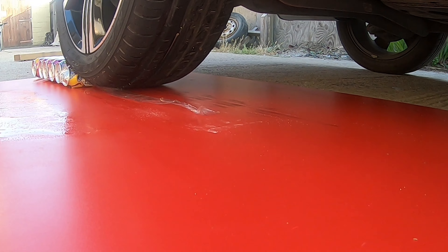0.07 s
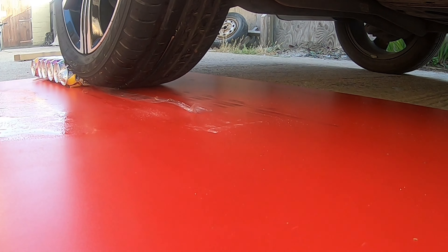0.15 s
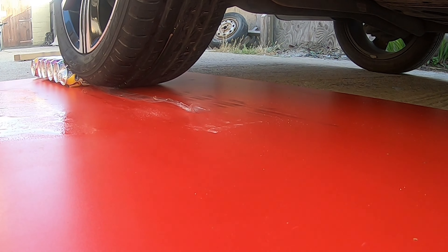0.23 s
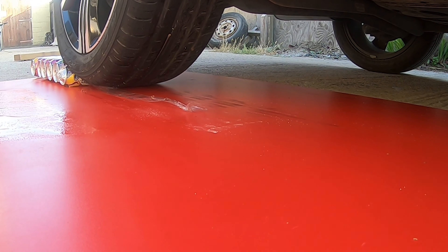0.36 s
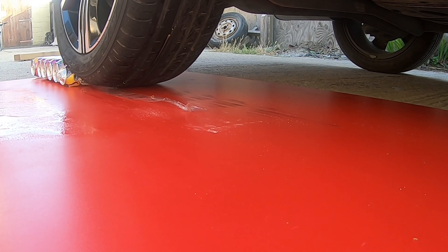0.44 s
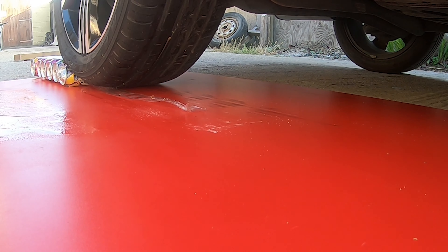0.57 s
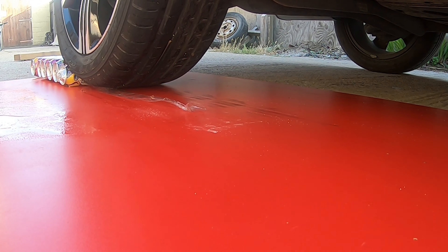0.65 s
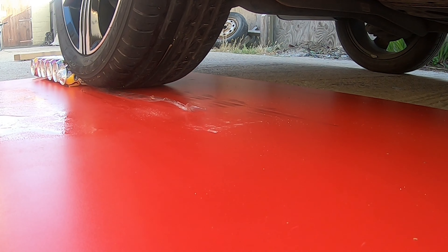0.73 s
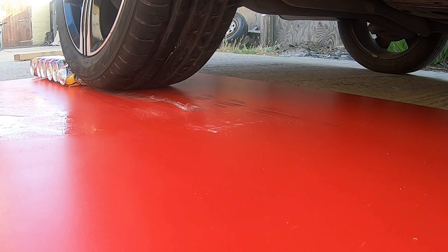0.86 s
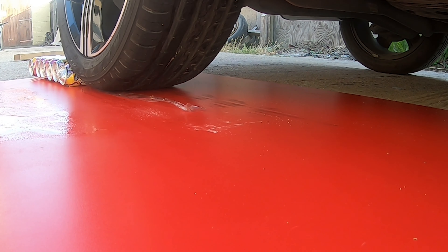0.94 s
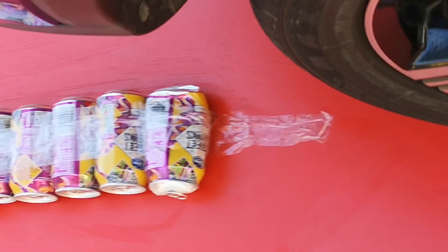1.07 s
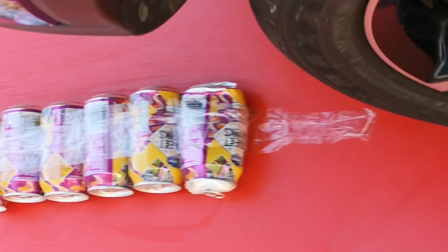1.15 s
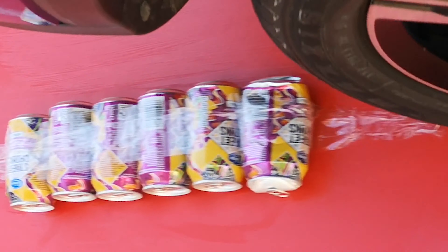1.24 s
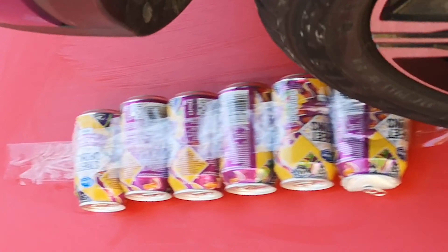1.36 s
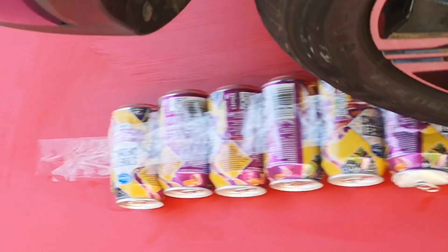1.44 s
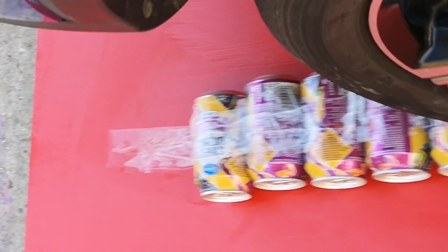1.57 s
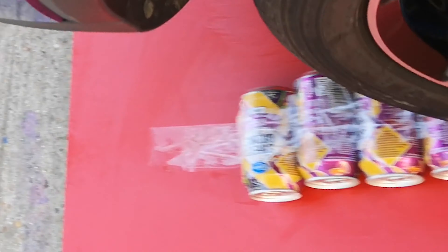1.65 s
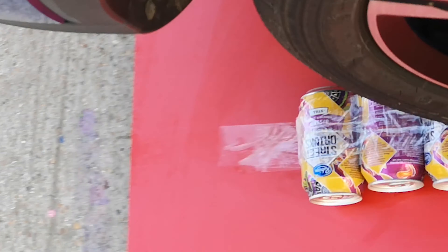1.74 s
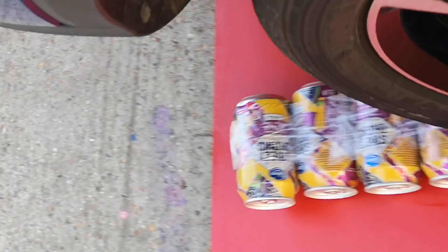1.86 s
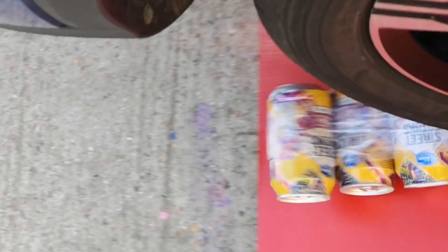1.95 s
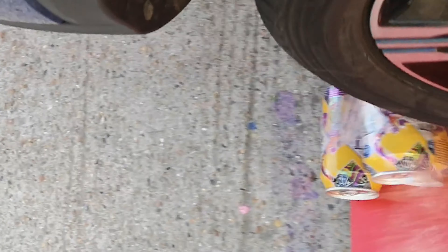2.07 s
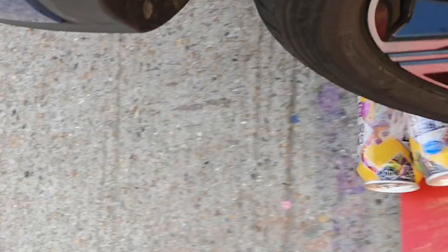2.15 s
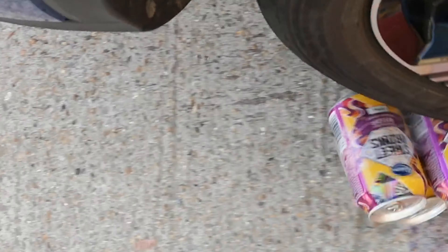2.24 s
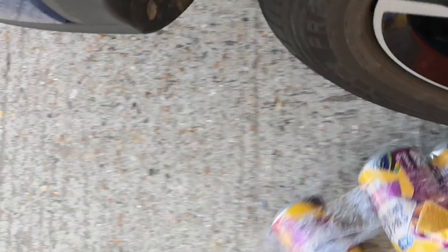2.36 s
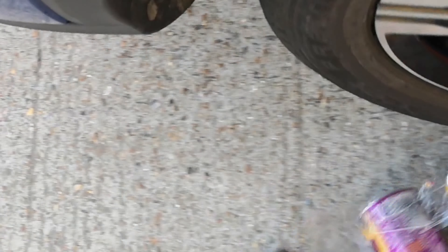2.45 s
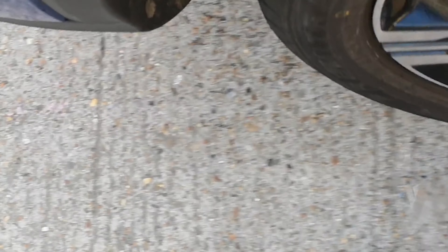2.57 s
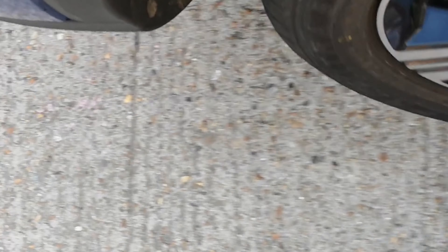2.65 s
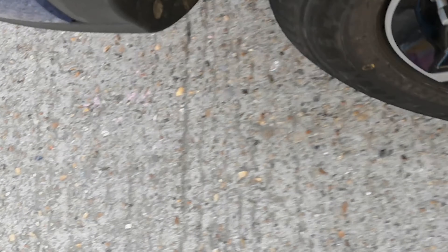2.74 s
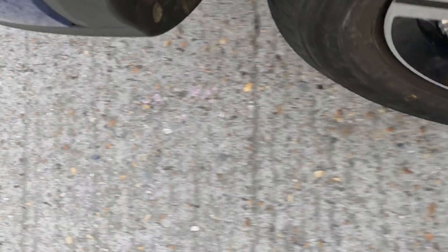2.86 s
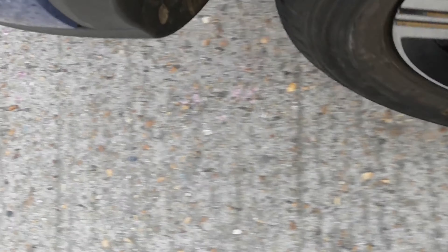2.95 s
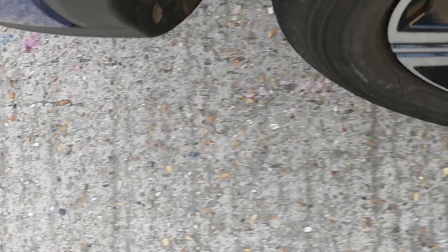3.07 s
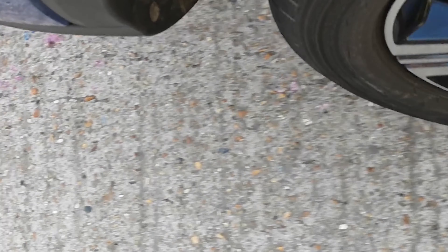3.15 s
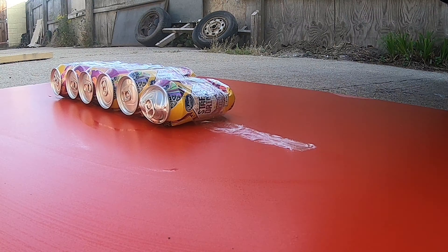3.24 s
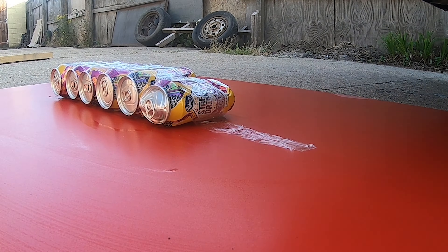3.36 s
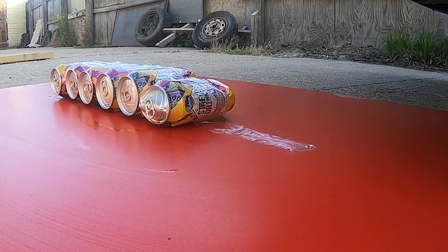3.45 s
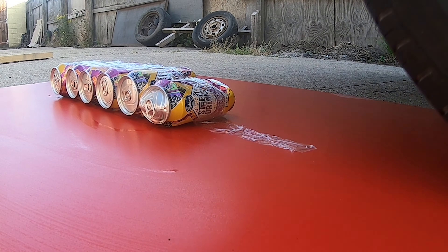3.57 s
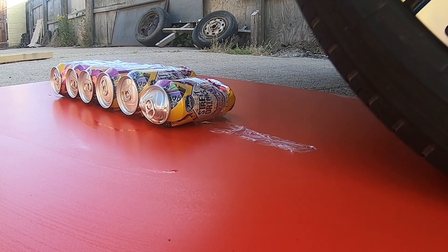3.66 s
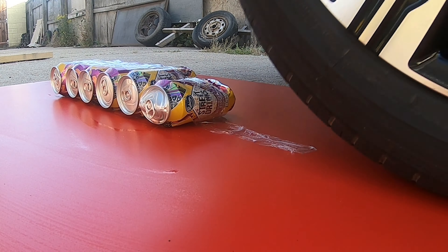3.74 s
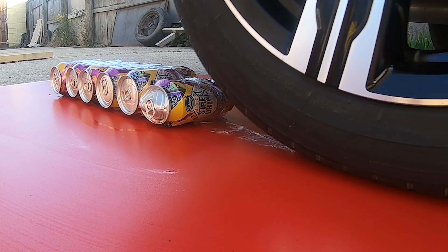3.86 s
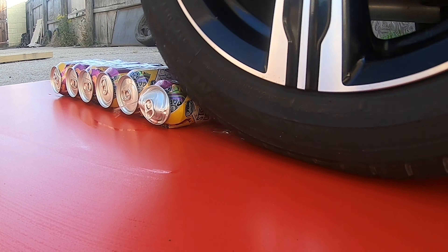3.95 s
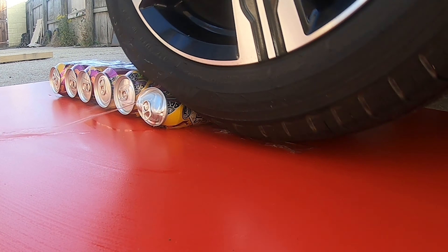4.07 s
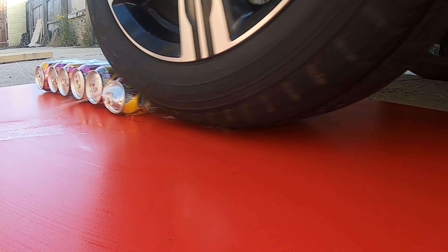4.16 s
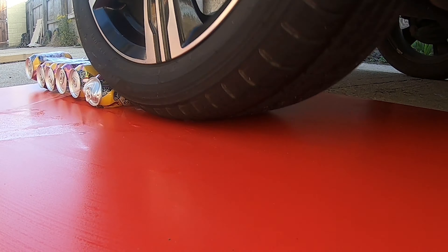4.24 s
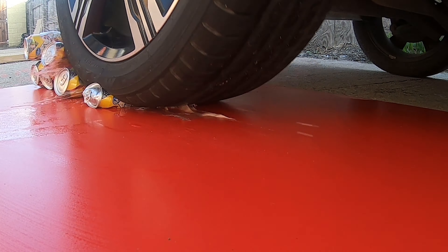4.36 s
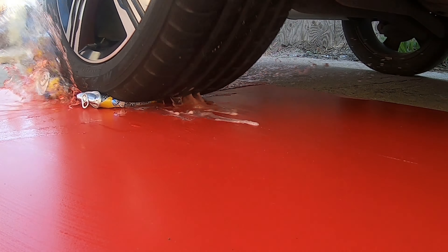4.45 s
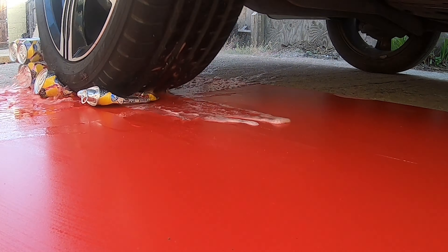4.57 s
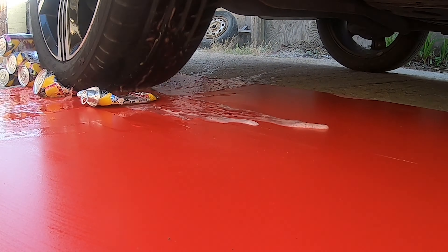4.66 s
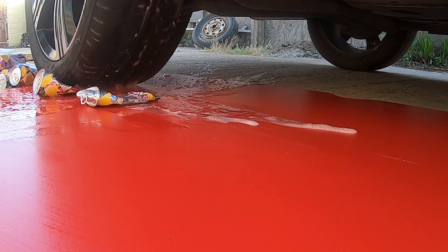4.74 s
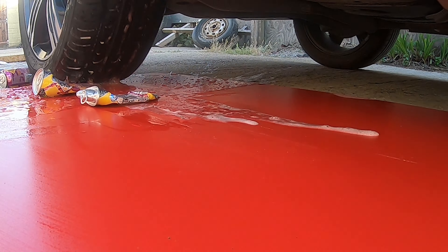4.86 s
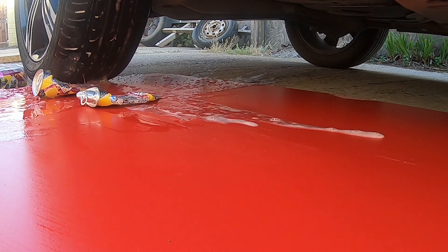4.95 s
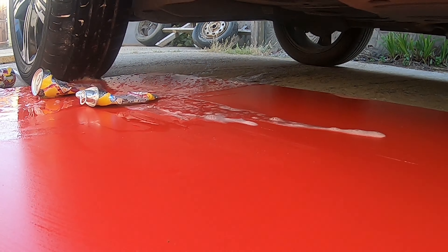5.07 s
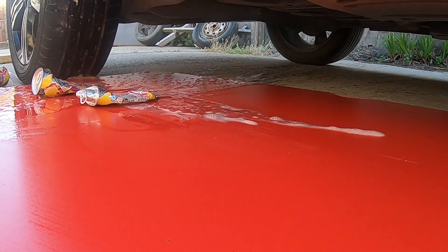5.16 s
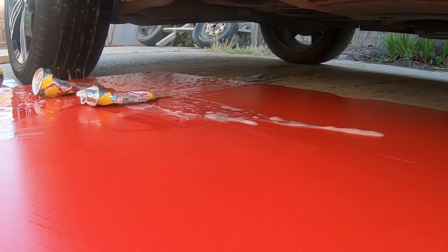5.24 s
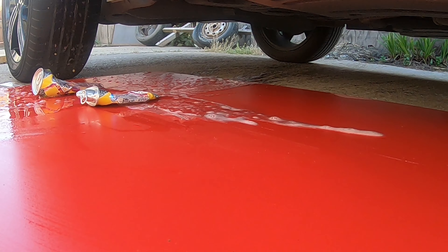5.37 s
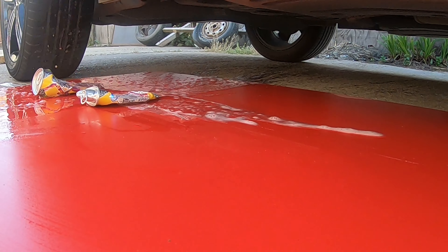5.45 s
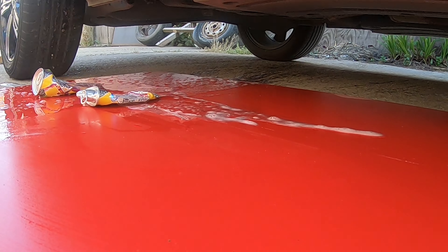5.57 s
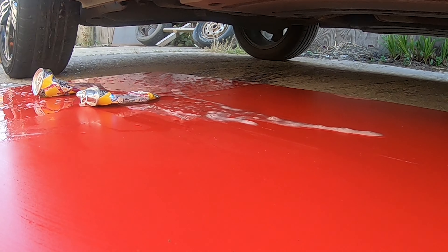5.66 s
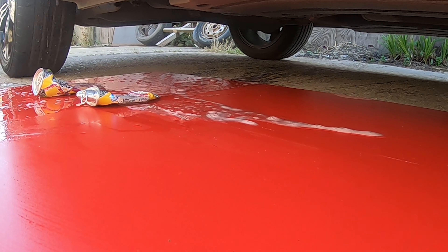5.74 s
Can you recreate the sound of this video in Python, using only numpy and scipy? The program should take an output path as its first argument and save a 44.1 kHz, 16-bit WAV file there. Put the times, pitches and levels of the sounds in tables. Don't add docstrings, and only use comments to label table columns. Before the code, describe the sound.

Close by, thin metal cans crumple and burst under a rolling wheel in two rounds, hissing and spurting over booming board rumble.

```python
import sys
import numpy as np
from scipy import signal
from scipy.io import wavfile
from scipy.ndimage import uniform_filter1d

SR = 44100
rng = np.random.default_rng(int(sys.argv[2]) if len(sys.argv) > 2 else 0)


def how_loud(loudness_db):
    steps = np.asarray(loudness_db, float) / 20
    return 10 ** steps


def file_out(sig):
    cols = np.atleast_2d(sig).T
    lim = np.clip(cols, -1, 1)
    pcm = np.round(lim * 32767).astype(np.int16)
    wavfile.write(sys.argv[1], SR, pcm)


N = 256220
TIME = np.arange(N) / SR

# time_s, dull_share (0-1)
DULL = [
    (.66, 1),
    (.69, .75),
    (1.16, .75),
    (1.2, 0),
    (4.42, .2),
    (4.46, 1),
]
STAGE_S = [
    0,
    1.598,
    2.66,
    3.324,
    3.949,
]


def evened(x):
    return x / np.sqrt(np.mean(x ** 2) + 1e-20)


def read(points, hz):
    point_hz, value = np.transpose(points)
    return np.interp(np.log(hz + 1), np.log(point_hz + 1), value)


def over_time(points, t):
    return np.interp(t, *np.transpose(points))


def add(mix, start_s, sound):
    part = mix[:, round(start_s * SR):][:, :sound.shape[-1]]
    part += sound[..., :part.shape[1]]


def frame_grid(size):
    return np.arange(4 * N // size + 5) * size / 4 / SR, np.fft.rfftfreq(size, 1 / SR)


def noise(field_db, size):
    real, imaginary = rng.standard_normal(field_db.shape + (2, 2)).T
    spectra = (real + 1j * imaginary) * how_loud(field_db.T) * np.sqrt(1.5 * SR / size / 2)
    return signal.istft(spectra, nperseg=size, noverlap=3 * size // 4)[1][:, :N]


def patches(shape, frames, bins):
    smooth = uniform_filter1d(rng.standard_normal(shape), frames, 0)
    return evened(uniform_filter1d(smooth, bins, 1))


def band_db(shape_db, hz, lo_hz, hi_hz):
    inside = (hz >= lo_hz) & (hz < hi_hz)
    return 10 * np.log10((how_loud(shape_db) ** 2)[inside].sum() * hz[1])


def ring(x, hz, width_hz):
    r = np.exp(-np.pi * width_hz / SR)
    return signal.lfilter([1, 0, -r], [1, -2 * r * np.cos(2 * np.pi * hz / SR), r * r], x)


def bursts(rows, t):
    peak_s, db, rise_s, fall_s = np.transpose(rows)[:, :, None]
    before = (peak_s - t) / np.maximum(rise_s, .005)
    after = (t - peak_s) / np.maximum(fall_s, .005)
    away = np.where(t < peak_s, before, after)
    return (how_loud(db - 20 * away) ** 2).sum(0)


def knocks(rows, level_db, width, edge, tail):
    out, t = np.zeros((2, N)), np.arange(2500) / SR
    for start_s, peak_db, hz in rows:
        rough = rng.standard_normal((2, len(t)))
        blow = (t == 0) * np.sign(rough[:, :1]) + tail * rough * how_loud(-60 * t / 0.044)
        body = ring(ring(blow, hz, width * hz), hz, hz)
        wide = ring(ring(blow, 3000, 6000), 4900, 7900)
        knock = body / abs(body).max() + edge * wide / abs(wide).max()
        add(out, start_s, how_loud(peak_db + level_db) * knock)
    return out


def yard():
    # pitch_hz, level_db
    hush_colour = [(260, -33), (450, 8.5), (1020, 4.5), (1810, -1), (3220, -15), (6180, -10.5),
                   (9000, -24.5), (14000, -71)]
    hush_db, lower_part_db = -57, -6.5
    t, hz = frame_grid(size=1024)
    field = read(hush_colour, hz) + 3.2 * patches((len(t), len(hz)), 12, 8)
    field += lower_part_db * np.outer(1 - over_time(DULL, t), hz < 1200)
    return how_loud(hush_db) * evened(noise(field, size=1024))


def hums():
    # start_s, end_s, pitch_hz, width_hz, level_db
    hum_rows = [(3.33, 4.4, 3600, 180, -60), (3.6, 3.96, 3380, 290, -54), (3.58, 3.92, 7300, 590, -59),
                (1.2, 1.9, 3520, 130, -62.5), (0.71, 1.1, 4400, 400, -61), (2.93, 3.27, 2180, 450, -43),
                (.07, 0.147, 1320, 220, -43), (1.77, 1.95, 1970, 430, -28), (1.3, 1.36, 2230, 280, -52),
                (2.06, 2.19, 400, 40, -39), (2.09, 2.19, 290, 26, -28.5), (4.74, 4.86, 502, 47, -39.5),
                (1.885, 1.935, 8300, 1100, -17.5)]
    out = np.zeros((2, N))
    for start_s, end_s, hz, width_hz, db in hum_rows:
        air = rng.standard_normal((2, round((end_s - start_s) * SR)))
        swell = signal.windows.tukey(air.shape[1], .2)
        add(out, start_s, how_loud(db) * evened(ring(air, hz, width_hz)) * swell)
    return out


def board():
    # pitch_hz, level_db (per Hz)
    board_colour = [(12, -44), (20, 11), (70, 21), (179, -2.5), (316, -12), (492, -22), (600, -26),
                    (1320, -120)]
    # peak_s, level_db, rise_s, fall_s
    heave_rows = [(.718, -30.5, 0.36, 0.15), (1.173, -30.5, 0.51, 0.36), (1.692, -25, 0.077, 0.35),
                  (1.972, -28.5, 0.023, .07), (2.516, -17, 0.28, 0.079), (2.64, -21, 0.058, 1),
                  (3.362, -16.5, 0.31, 0.019), (3.636, -19, 0.31, 0.34), (3.867, -20, 0.27, 0.052),
                  (4.326, -15, 0.32, 0.058), (4.496, -23, 0.23, 0.1), (4.681, -17.5, 0.22, 0.26),
                  (4.97, -12.5, 0.017, 0.66), (5.46, -25.5, 0.108, 0.48)]
    # peak_s, level_db, rise_s, fall_s
    boom_rows = [(0.02, -37, 0.37, 0.66), (.95, -38.5, 1.64, 1), (1.692, -34, 0.02, 1),
                 (1.972, -20.5, 0.033, 0.088), (2.2, -34, 0.35, 0.82), (2.64, -26, 0.05, 0.3),
                 (3.103, -26, 0.033, 0.34), (3.991, -25.5, 0.032, 0.63), (4.326, -13.5, 0.26, 0.12),
                 (4.496, -21.5, 0.27, 0.23), (4.97, -10, 0.0092, 0.12), (5.13, -19, 0.075, 0.053),
                 (2.44, -27, 0.11, 0.055), (5.46, -31.5, 0.054, 0.21)]
    heave_in_boom_db, idle_push_db, idle_boom_db = -18, -44, -68.5
    t, hz = frame_grid(size=1024)
    heave, boom, shape = bursts(heave_rows, t), bursts(boom_rows, t), read(board_colour, hz)
    push_power = heave + boom + how_loud(2 * idle_push_db)
    boom_power = boom + heave * how_loud(2 * heave_in_boom_db) + how_loud(2 * idle_boom_db)
    push_db = 10 * np.log10(push_power) - band_db(shape, hz, 30, 130)
    boom_db = 10 * np.log10(boom_power) - band_db(shape, hz, 130, 400)
    boom_share = np.clip(np.log((hz + 1) / 100) / .5, 0, 1)
    field = shape + np.outer(push_db, 1 - boom_share) + np.outer(boom_db, boom_share) - 40 * (hz > 600)
    return noise(field + 3.96 * patches(field.shape, 5, 2) - 1.5, size=1024)


def thumps():
    # start_s, peak_db, pitch_hz
    thump_rows = [(1.954, -6.5, 68), (2.11, -13.5, 432), (2.364, -14, 133), (2.623, -9.5, 312),
                  (3.082, -26.5, 126), (3.207, -28, 166), (3.982, -16, 97.5), (4.104, -7, 170),
                  (4.432, -4, 470), (4.964, 0.5, 50.7), (5.02, -9.5, 184), (5.154, -13.5, 138),
                  (5.129, -15, 199), (5.255, -24, 107)]
    out, t = np.zeros((2, N)), np.arange(9000) / SR
    quarter_turn = np.array([[0], [np.pi / 2]])
    for start_s, db, hz in thump_rows:
        swing = np.sin(2 * np.pi * hz * t * (1 - 0.32 * t) + quarter_turn)
        rough = rng.standard_normal(len(t))
        swing = swing + 0.37 * evened(ring(ring(rough, 230, 350), 230, 350))
        add(out, start_s, how_loud(db - 6.0 - 60 * t / 0.16) * np.minimum(t / 0.0006, 1) * swing)
    return out


def bumps():
    # start_s, peak_db, pitch_hz
    bump_rows = [(1.219, -36, 485), (2.076, -10, 563), (2.113, -6.5, 582), (2.622, -9, 820),
                 (4.966, -0.5, 463), (4.974, -7.5, 686), (5.004, -12.5, 865), (5.062, -25, 754),
                 (5.092, -20, 778), (5.127, -21.5, 1040), (3.9915, -9.5, 910), (5.259, -25.5, 904),
                 (4.0, -15, 700), (5.491, -24, 1000)]
    return knocks(bump_rows, level_db=-4.5, width=0.11, edge=.01, tail=0.19)


def grit_clicks():
    # start_s, peak_db, pitch_hz
    click_rows = [(0.6956, -22, 3040), (0.7417, -21, 6300), (0.762, -27, 3030), (0.8047, -15.5, 4540),
                  (0.8474, -38, 3840), (0.9506, -25, 2990), (0.984, -32, 6090), (1.014, -25, 4520),
                  (1.0425, -30, 2500), (1.0723, -32, 4770), (1.088, -37, 4100), (1.1265, -39, 5850),
                  (1.15, -2, 5600), (1.2205, -41, 5000), (1.2114, -35, 3600), (1.256, -36, 3820),
                  (3.5124, -40, 6100), (3.6455, -31, 3650), (3.7334, -36, 3330), (3.913, -26, 3600),
                  (3.936, -22.5, 3770), (4.4245, -14, 2500), (4.8514, -20, 5930), (4.8883, -28, 4410),
                  (4.9004, -28, 6170), (4.3468, -1, 1490), (5.0045, -29, 4390), (5.158, -20, 3050),
                  (5.1831, -29, 4130), (4.033, -16, 3600), (5.2674, -32, 2850), (5.3702, -31.5, 4500),
                  (5.472, -27, 5560), (5.6266, -37, 5770)]
    return knocks(click_rows, level_db=-4, width=1, edge=0.51, tail=0.042)


def rattle():
    # start_s, peak_db, pitch_hz
    rattle_rows = [(0.094, -27.5, 1310), (1.3059, -32, 2110), (1.7884, -14, 1470), (1.8354, -13, 1840),
                   (2.176, -16, 1610), (2.2414, -18, 2110), (2.3637, -17, 1890), (2.4056, -7, 2330),
                   (2.4324, -17, 2160), (2.4836, -11, 2040), (2.5945, -29, 2130), (2.606, -16, 2070),
                   (2.7003, -34, 2830), (2.758, -31, 1640), (2.7918, -29, 1520), (2.811, -23, 2660),
                   (2.8838, -37, 2100), (2.9243, -24.5, 2350), (2.9336, -26, 1710), (2.9916, -24, 1780),
                   (3.0814, -25, 1820), (3.1448, -19.5, 1730), (3.162, -23, 1580), (3.1772, -17.5, 1750),
                   (3.2145, -19.5, 1770), (4.782, -24.5, 1500), (5.4385, -34, 1950)]
    return knocks(rattle_rows, level_db=-2, width=0.08, edge=0.12, tail=0.25)


def squeaks():
    # start_s, length_s, start_hz, end_hz
    slip_rows = [(.058, .02, 3600, 9000), (.237, .029, 3650, 3520), (.255, .025, 6500, 6100),
                 (.26, .036, 3250, 1400), (.803, .05, 1020, 1150), (.895, .03, 1100, 1400),
                 (.895, .03, 2100, 2700), (.9, .025, 4050, 5000), (.895, .025, 6000, 6600),
                 (.835, .05, 4000, 3780), (2.0, .2, 217, 222), (2.2, .18, 216, 212), (3.19, .05, 66, 66),
                 (4.05, .06, 62, 55), (4.16, .07, 185, 178), (4.22, .08, 62, 72), (4.31, .08, 170, 180),
                 (4.455, .045, 510, 490), (4.47, .055, 310, 330), (4.63, .11, 173, 170),
                 (5.575, .062, 95, 92), (5.345, .05, 92, 98), (5.058, .035, 95, 105),
                 (2.365, .07, 1950, 2050), (3.195, .035, 172, 176), (4.04, .28, 192, 172),
                 (4.1, .14, 66, 70), (4.3, .13, 76, 80), (4.44, .09, 80, 82), (4.43, .09, 172, 180),
                 (4.63, .12, 70, 76), (2.49, .07, 115, 95), (.262, .02, 6200, 4400)]
    slip_db = [-50, -42, -42, -40, -48, -51, -49, -49, -51, -54, -27.5, -30, -17, -14.5, -18, -15, -14.5,
               -14.5, -18, -27.5, -21.5, -21.5, -17, -31, -21, -22, -19, -20, -17, -22, -23, -24, -46]
    out = np.zeros((2, N))
    waver = evened(uniform_filter1d(uniform_filter1d(rng.standard_normal(N), 60), 60))
    quarter_turn = np.array([[0], [np.pi / 2]])
    for (start_s, length_s, start_hz, end_hz), db in zip(slip_rows, slip_db):
        hz = np.geomspace(start_hz, end_hz, round(length_s * SR))
        shake = waver[round(start_s * SR):][:len(hz)]
        shaken_hz = hz * (1 + min(.035, 110 / start_hz) * shake)
        turn = 2 * np.pi * np.cumsum(shaken_hz) / SR + quarter_turn
        tone = (np.sin(turn) + 0.015 * np.sin(2 * turn)) * signal.windows.tukey(len(hz), .6)
        grip = np.roll(shake, 500) * np.clip(start_hz / 1000, .15, .6 + length_s)
        add(out, start_s, np.sqrt(2) * how_loud(db + 5 * grip) * tone)
    return out


def crush():
    band_hz = [400, 1200, 3500, 9500, 15500]
    # pitch_hz, level_db (per Hz)
    colours = [
        [(240, -14), (400, -16.5), (828, -23.5), (1640, -14), (2830, -12), (5350, -7.5), (6220, -2),
         (9500, -10.5), (15000, -13)],
        [(240, -17.5), (600, -19), (1970, -6.5), (3100, -9), (6220, -8.5), (7700, -3.5), (11600, -23),
         (15000, -24.5)],
        [(240, -6), (464, -3.5), (620, -3.5), (1810, -19.5), (3050, -44), (4100, -45.5), (6400, -58),
         (7300, -75.5), (22000, -120)],
    ]
    stage_colour = [0, 1, 1, 0, 0]
    grit_db = [0.54, 0.82, 1.4, 0.6, 1.2]
    # peak_s, level_db, rise_s, fall_s
    crumple_rows = [(.106, -37.5, 0.048, 0.069), (1.648, -26.5, 0.02, 0.048), (1.963, -17, 0.004, 0.092),
                    (2.125, -23, 0.21, 0.4), (2.623, -17.5, 0.028, 0.065), (3.155, -31.5, 0.032, 0.075),
                    (3.993, -16.5, 0.025, 0.03), (4.308, -19, 0.023, 0.086), (4.49, -22.5, 0.35, 0.1),
                    (4.968, -15.5, 0.015, 0.046), (4.468, -19, 0.03, 0.053), (5.49, -31.5, 0.0072, 0.091)]
    # peak_s, level_db, rise_s, fall_s
    spurt_rows = [(0.105, -31.5, 0.022, 0.033), (1.305, -33.5, 0.037, 0.14), (1.646, -19.5, 0.023, 0.06),
                  (1.871, -15, 0.12, 0.12), (1.965, -7.5, 0.0023, 0.081), (2.406, -11.5, 0.033, 0.14),
                  (2.931, -33, 1, 0.028), (3.15, -30.5, 0.017, 0.23), (4.169, -9, 0.06, 0.16),
                  (4.307, -12, 0.0078, 0.078), (4.55, -21.5, 0.048, 0.19), (4.744, -24, 0.0091, 0.19),
                  (5.491, -33, 0.022, 0.43)]
    # peak_s, level_db, rise_s, fall_s
    hiss_rows = [(0.264, -35.5, 0.053, 0.06), (.806, -45, 0.64, 0.75), (1.149, -32.5, 0.019, 0.047),
                 (1.702, -26, 0.088, 0.1), (1.777, -19.5, 0.024, 0.22), (1.902, -13.5, 0.022, 0.063),
                 (1.99, -16, 0.071, 0.17), (2.077, -19, .02, 0.076), (2.194, -17.5, 0.021, 0.26),
                 (2.398, -19.5, 0.0033, 0.076), (2.484, -24, .006, 0.14), (2.542, -20, 0.0055, 0.0644),
                 (3.993, -17, 0.012, 0.033), (4.05, -18, 0.033, 0.046), (4.258, -11.5, 0.043, 0.055),
                 (4.348, -19.5, 0.0081, 0.073), (4.401, -19, 0.016, 0.097), (4.55, -21, 0.038, 0.055),
                 (4.744, -23.5, 0.011, 0.055), ]
    # time_s, level_db
    trickle_points = [(0.0, -42), (1.625, -65), (1.65, -36.5), (2.95, -35.5), (3.29, -33), (3.32, -59),
                      (3.59, -41.5), (3.94, -41), (3.98, -24), (4.45, -29), (4.9, -32.5), (5.4, -41),
                      (5.81, -42)]
    # band1_db, band2_db, band3_db, band4_db
    kind_bands = [
        (3, -5, -15, -41.5),
        (-17.5, 1, -8, -32),
        (-17.5, -1.5, 0.5, -18.5),
        (-8.5, -7, -7, -25.5),
    ]
    # time_s, level_db
    fizz_points = [(.66, -13), (.69, 2), (1.14, -16.5), (1.2, 11), (3.3, 1.5), (3.33, 0), (3.93, -12),
                   (3.96, -5.5), (4.28, 5), (4.46, -15.5)]

    t, hz = frame_grid(size=256)
    power = [bursts(rows, t) for rows in (crumple_rows, spurt_rows, hiss_rows)]
    power.append(how_loud(2 * over_time(trickle_points, t)))
    levels = 10 * np.log10(np.transpose(power) @ how_loud(2 * np.array(kind_bands)))
    levels[:, -1] += over_time(fizz_points, t)

    centres = np.log(np.sqrt(np.multiply(band_hz[1:], band_hz[:-1])))
    spread = np.array([np.interp(np.log(hz + 1), centres, one) for one in np.eye(4)])
    field = np.full((len(t), len(hz)), -200.)
    dull_ending = (DULL[-2][0], len(colours) - 1)
    for start_s, number in list(zip(STAGE_S, stage_colour)) + [dull_ending]:
        shape = read(colours[number], hz) - 60 * (hz > 15500)
        own_db = [band_db(shape, hz, lo, hi) for lo, hi in zip(band_hz, band_hz[1:])]
        later = t >= start_s
        field[later] = shape + (levels[later] - own_db) @ spread
    hiss = noise(field + 1.63 * patches(field.shape, 14, 5) - 2.6, size=256)

    grit = np.zeros(N)
    for start_s, size_db in zip(STAGE_S, grit_db):
        grit[TIME >= start_s] = size_db
    happens = rng.random(N) < 210 / SR
    pops = how_loud(grit * np.minimum(rng.exponential(1, N), 3.2)) * happens
    crackle = 1 + signal.lfilter([1], [1, -np.exp(-1 / (0.0017 * SR))], pops)
    crackle = uniform_filter1d(crackle, 24)
    return hiss * crackle / np.sqrt(uniform_filter1d(crackle ** 2, 2500))


def pings(hiss):
    can_hz = [1375, 1680, 2040, 2390, 2870, 3690, 4320, 5810, 7920]
    happens = rng.random(N) < 240 / SR
    size = how_loud(2.0 * np.minimum(rng.exponential(1, N), 4)) * happens
    which, signs = rng.integers(0, len(can_hz), N), rng.choice([-1., 1.], N)
    out, t = np.zeros((2, N)), np.arange(1500) / SR
    for k, hz in enumerate(can_hz):
        near = signal.lfilter(*signal.iirpeak(hz, 2, SR), hiss[0])
        level = np.sqrt(abs(uniform_filter1d(near ** 2, 900)))
        dent = np.sin(2 * np.pi * hz * t) * how_loud(-60 * t / (0.019 + 30 / hz)) * np.minimum(t / 0.00061, 1)
        strikes = level * size * (which == k) * np.array([np.ones(N), signs])
        out += signal.oaconvolve(strikes, dent[None])[:, :N]
    return how_loud(-1.5) * out


def cracks():
    # start_s, peak_db, pitch_hz
    crack_rows = [(1.6352, -12, 4640), (1.7174, -4, 7910), (1.7624, -8.5, 4650), (1.7888, -7, 9240),
                  (1.8054, -7.5, 5670), (1.8362, -0.5, 7200), (1.8504, -14, 7090), (1.9114, 0, 7500),
                  (1.9184, 3.5, 7700), (1.9304, -6.5, 7630), (2.0004, -2, 5290), (2.0054, -11, 4930),
                  (2.0174, -8.5, 7480), (2.0772, -4.5, 3850), (2.0944, -7, 7220), (2.1141, -4.5, 7540),
                  (2.2064, -4.5, 4630), (2.2238, -13.5, 7800), (2.2423, -8, 7920), (2.3426, -16, 7730),
                  (2.3994, 7, 6960), (2.5037, -10, 5900), (2.609, -9, 7510), (4.3305, -9, 3600),
                  (3.9812, -3.5, 3800), (4.1064, -5, 4600), (4.1252, -9.5, 4800), (4.3465, -4.5, 3900),
                  (4.4233, -15, 3760), (4.5401, -16.5, 5970), (4.5855, -19, 3930)]
    return knocks(crack_rows, level_db=-4, width=0.17, edge=.3, tail=0.089)


def snaps():
    # start_s, peak_db, ring_hz
    tick_rows = [(0.698, -23.5, 2720), (0.742, -39, 6540), (0.7604, -29, 2040), (0.8043, -23.5, 4750),
                 (0.9519, -24.5, 1790), (0.983, -32, 1590), (1.044, -28.5, 2280), (1.1498, -16.5, 1540),
                 (1.22, -38, 1617), (2.814, -22, 2870), (2.9257, -31, 1710), (2.9897, -29, 1800),
                 (3.0226, -17, 2080), (3.124, -24, 3870), (3.081, -32, 1900), (4.1204, -8.5, 4840),
                 (4.89, -23, 4440), (5.264, -33, 1530)]
    # start_s, peak_db, ring_hz, knock_db (over the tick)
    first_snaps = [(1.6174, -21.5, 2720, -27), (1.6436, -10, 1510, -13.5), (1.7011, -6.5, 8350, -34.5),
                   (1.887, -0.5, 8450, -20.5), (1.9596, -14, 1570, 16), (2.0006, -4, 1630, -2),
                   (2.0172, -8, 6700, -22), (2.0776, -8, 4000, -11.5), (2.1922, -6, 1570, -15),
                   (2.396, -9, 1960, -23.5), (2.4835, -13, 2040, 0.5), (2.543, -8, 1710, -25.5),
                   (2.621, -18.5, 1710, -51)]
    # start_s, peak_db, ring_hz, knock_db (over the tick)
    second_snaps = [(3.9616, -19, 1620, 6), (3.9735, -15, 2520, -7), (4.0475, -9, 7550, -32),
                    (4.1092, -3.5, 4600, -37), (4.135, -3.5, 6600, -5), (4.306, -15, 1560, 11),
                    (4.347, -16.5, 1690, 9), (4.4222, -12.5, 4830, 5.5), (4.465, -16.5, 1600, 2),
                    (4.5863, -16, 4830, -19), (4.7444, -18.5, 1760, -3), (4.9663, -27, 1210, 0),
                    (5.094, -41, 1500, -5), (5.16, -34, 1470, 10.5), (5.489, -45, 1880, -7)]
    tick_knock_db, ring_s, knock_s = -13, 0.093, 0.037
    out, t = np.zeros((2, N)), np.arange(3000) / SR
    ticks = [(*row, tick_knock_db) for row in tick_rows]
    for start_s, db, hz, knock_db in [*ticks, *first_snaps, *second_snaps]:
        narrow, broad, low = rng.standard_normal((3, 2, len(t)))
        tick = evened(ring(ring(narrow, hz, 0.35 * hz), hz, 0.35 * hz))
        tick = tick + 0.56 * evened(ring(ring(broad, 2200, 8800), 6300, 4300))
        fall = how_loud(-60 * t / ring_s) * 0.2 + how_loud(-60 * t / 0.0072)
        knock_fall = how_loud(knock_db - 60 * t / knock_s) * np.minimum(t / 0.0033, 1)
        knock = evened(ring(ring(low, 1400, 1000), 550, 600)) * knock_fall
        add(out, start_s, how_loud(db - 4.0) * (tick * fall + knock))
    return out


def treble_loss(x):
    top_cut = signal.firwin(301, 15600, window=("kaiser", 8), fs=SR)
    treble_cut = signal.firwin(41, 8200, window=("kaiser", 7), fs=SR)
    x = signal.oaconvolve(x, top_cut[None], "same")
    dull = signal.oaconvolve(x, treble_cut[None], "same")
    share = np.clip(over_time(DULL, TIME), 0, 1)
    gap = signal.lfilter(*signal.iirpeak(10300, 2, SR), x - dull) * (share > .5)
    return dull + (1 - share) * (x - dull - gap)


def ports(shared, other):
    # time_s, bass_lean_db, treble_lean_db (left over right), bass_unlike, rest_unlike (0-1)
    port_points = [(1.14, 0, 0, 0, 0), (1.2, 0, -1.5, .02, .8), (2.28, 0, 0, 0.2, 1),
                   (2.34, -7, 0, .9, .95), (2.65, -1.5, -1, .55, .95), (3.3, 0.5, -3, .03, 1),
                   (3.45, -7, -4, .86, 1), (4.3, -7.5, 1, .9, .7), (4.75, -1.5, 0.2, .25, .12),
                   (5.37, 0, 0, 0, 0)]
    # pitch_hz, share (0-1)
    turned_points = [(150, .5), (700, .8), (5000, .2)]
    # pitch_hz, lean_db (left over right)
    lobe_points = [(6000, 0), (7900, 7), (9600, -6), (13000, -3)]
    # pitch_hz, factor
    width_points = [(900, 1.3), (1400, .5), (5000, .5), (9000, 1.6)]

    hz, t, (a, b) = signal.stft([shared, other], SR, nperseg=1024, noverlap=768)
    s, *columns = np.transpose(port_points)
    bass_db, treble_db, bass_unlike, rest_unlike = (np.interp(t, s, column) for column in columns)
    high = np.clip(np.log((hz + 1) / 300) / 1.0, 0, 1)
    first = t < STAGE_S[-2]

    lobe_db = np.outer(read(lobe_points, hz), first * rest_unlike)
    lean_db = np.outer(1 - high, bass_db) + np.outer(high, treble_db) + lobe_db
    lean = np.tanh(lean_db * np.log(10) / 20)

    bass_share, rest_share = read([(100, 1), (600, 0)], hz), read([(100, 0), (600, 1)], hz)
    unlike = np.outer(bass_share, np.clip(bass_unlike, 0, 1.3))
    unlike = unlike + np.outer(rest_share, np.clip(rest_unlike, 0, 1.3))
    widening = 1 + high * (read(width_points, hz) - 1)
    unlike = unlike * np.where(t < STAGE_S[-1], 1, widening[:, None])

    turned = np.outer(read(turned_points, hz), first)
    b = np.sqrt(1 - turned ** 2) * b - 1j * turned * a
    side_spectra = lean * a + unlike * np.sqrt(1 - lean ** 2) * b
    side = signal.istft(side_spectra, SR, nperseg=1024, noverlap=768)[1][:N]
    return np.array([shared + side, shared - side])


def scene():
    hiss = crush()
    metal = snaps() + pings(hiss) + cracks() + rattle()
    small = squeaks() + grit_clicks() + bumps() + hums()
    shared, other = yard() + board() + thumps() + hiss + treble_loss(metal + small)
    return ports(shared, other)


def band_limit(x):
    return signal.sosfilt(signal.butter(12, 16400, fs=SR, output="sos"), x)


def record(dry):
    mix = 1.074 * np.tanh(dry / 1.088)
    return band_limit(mix)


dry = scene()
out = record(dry)
file_out(out)
```